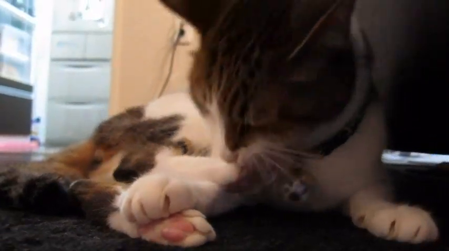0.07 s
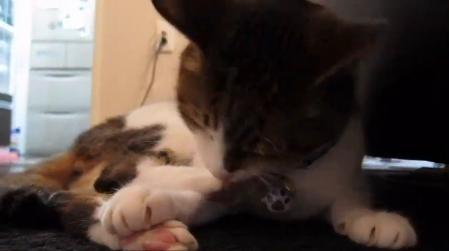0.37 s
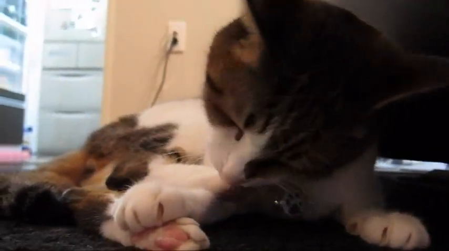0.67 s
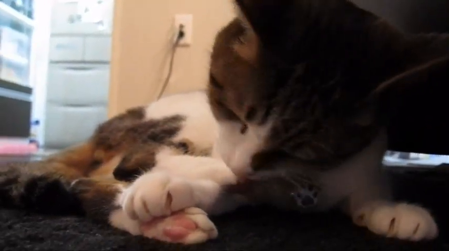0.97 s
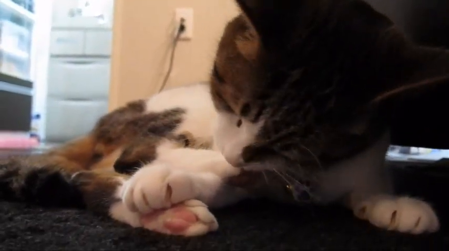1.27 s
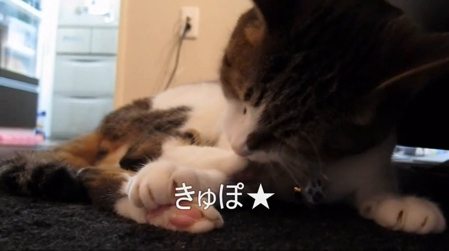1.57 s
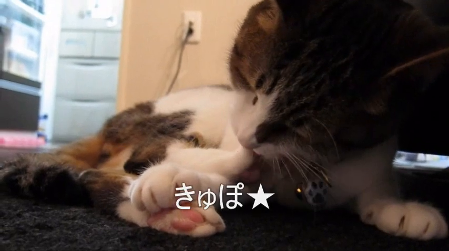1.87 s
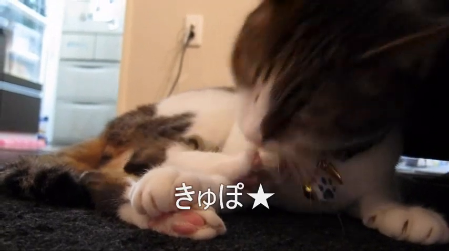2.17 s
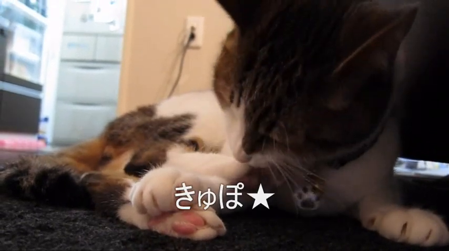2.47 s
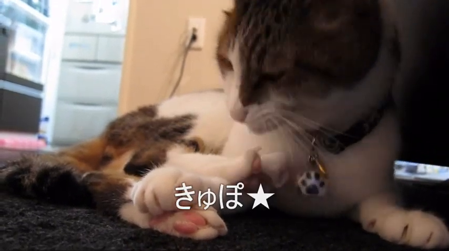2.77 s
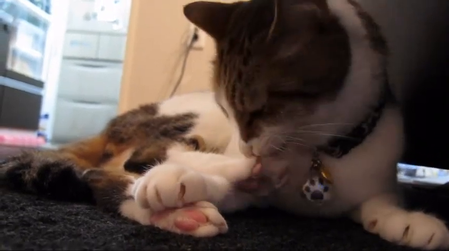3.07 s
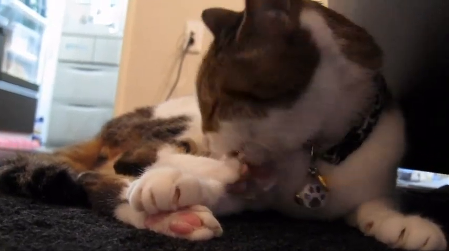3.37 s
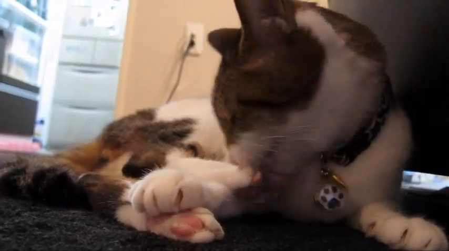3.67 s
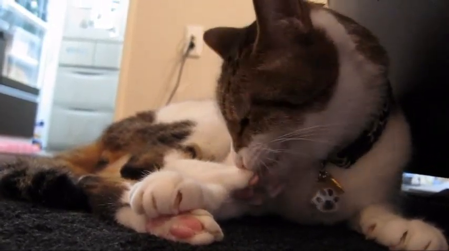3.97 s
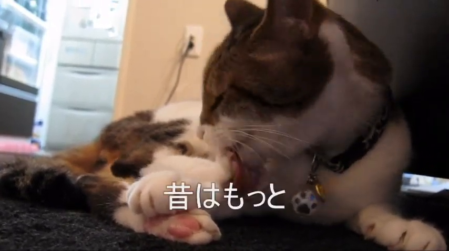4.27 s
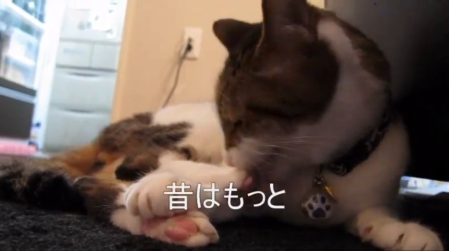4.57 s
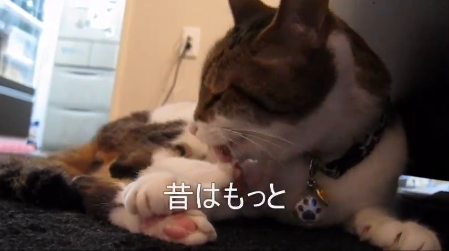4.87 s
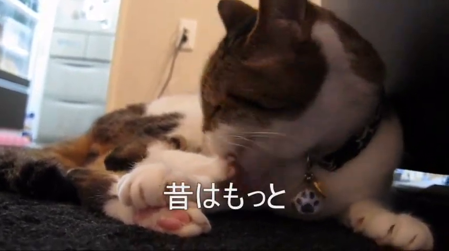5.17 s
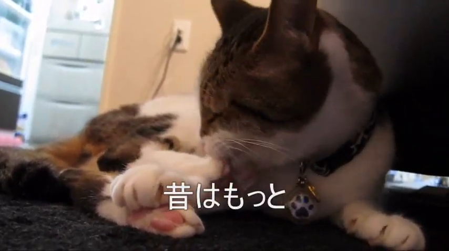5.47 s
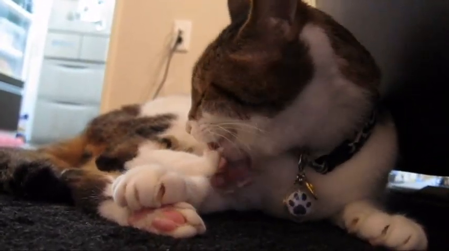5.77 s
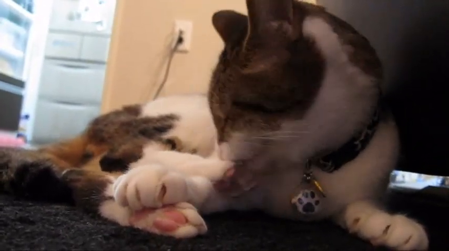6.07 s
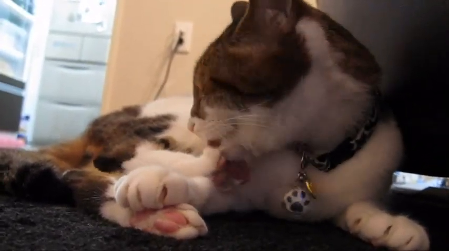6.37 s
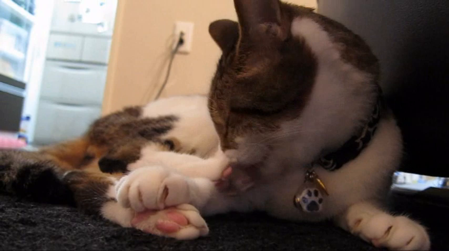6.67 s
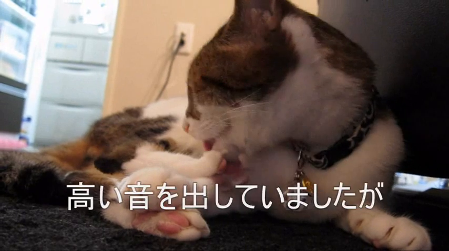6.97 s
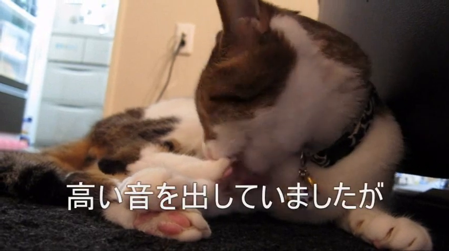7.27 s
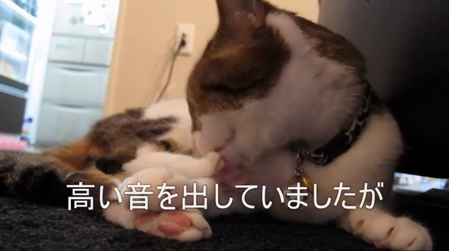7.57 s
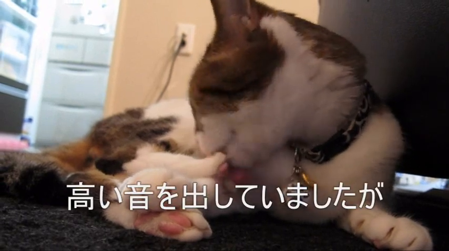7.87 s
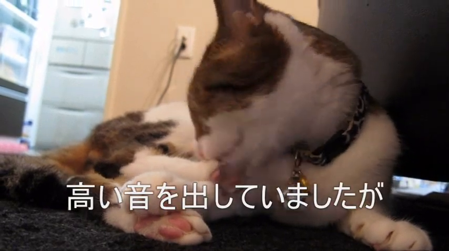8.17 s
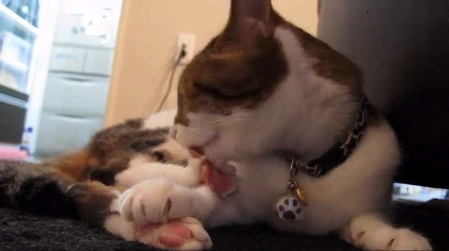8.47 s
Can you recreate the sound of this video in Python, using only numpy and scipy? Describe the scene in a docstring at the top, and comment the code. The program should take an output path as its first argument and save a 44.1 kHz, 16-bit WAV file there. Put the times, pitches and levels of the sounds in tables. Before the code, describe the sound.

Close to the microphone, a cat sucks its paw with short airy hisses and wet smacks. A small pop comes right at the start and a loud, sharp one about a second later, briefly ducking the background. More smacks follow, then the cat settles into soft, raspy licks about twice a second, with tiny saliva clicks. A fan hums steadily in the carpeted room.

```python
"""A fan hums in a carpeted room; close to the microphone, a cat sucks its paw, air hissing past its lips.
The lip seal breaks with a small pop, then at 1.3 s with a sharp one that overloads the recorder:
its gain control ducks the room and lets it swell back. Wet smacks follow, and from about 3 s the
rough tongue strokes the fur twice a second, each lick a rasp, a click and a crackle of saliva.
Around 6 s a low rumble swells and fades beneath the licking."""
import sys
import numpy as np
from scipy import signal
from scipy.fft import rfft, irfft, next_fast_len
from scipy.io import wavfile
from scipy.ndimage import uniform_filter1d

SR = 44100
rng = np.random.default_rng(int(sys.argv[2]) if len(sys.argv) > 2 else 0)


def transcribe(u):
    """Save the signal u as a 16-bit wav file named by the first command-line argument.

    u: samples, shape (n,) or (channels, n), limited to [-1, 1]; the rate is SR.
    q: integer samples, one column per channel.
    """
    v = np.clip(np.atleast_2d(u).T, -1, 1)
    q = np.round(v * 32767).astype(np.int16)
    wavfile.write(sys.argv[1], SR, q)


N = 384552
TIME = np.arange(N) / SR
CLICK_TIME = TIME[:4096]
POP_LEAD_SAMPLES = 64

# the fan's rumble: frequency_hz, level_db
FAN_COLOUR = [(20, -9), (35, -3.5), (90, 1.5), (170, 0.5), (330, 1.5), (430, -6), (600, -9), (880, -10),
              (1150, -14.5), (2000, -20.5), (4200, -25.5), (6000, -29.5), (8000, -40.5), (16000, -45.5)]
# the fan's hum: pitch_hz, level_db, wander_hz
FAN_TONES = [(88.4, -60.5, 2.5), (131.4, -50, 1.17), (265, -68, 2.5), (299.6, -58.5, 3), (519, -66.5, 1.46),
             (800, -53.5, 0.45)]
# microphone hiss: frequency_hz, level_db
MIC_COLOUR = [(2000, -6.5), (8000, -3), (10800, 1), (12300, -3), (14000, -5.5), (15700, -3.5)]
# faint electronic whine: pitch_hz, level_db, wander_hz
WHINE_TONES = [(4428, -72.5, 1), (8328, -78.5, 1), (8796, -83, 1), (13254, -85, 1), (13722, -82, 1)]
# one low swell in the room: middle_s, half_length_s, level_db, centre_hz
ROOM_SWELL = (6, 0.2, -42, 79)
# soft thuds of jaw and paw: start_s, level_db, pitch_hz, t60_s
THUDS = [(.185, -22.5, 127.8, 0.055), (0.787, -29, 150, 0.033), (1.284, -19.5, 125, .05),
         (1.329, -19, 279.7, 0.042), (1.332, -21.5, 80, .09), (2.082, -24, 307, 0.022),
         (5.2773, -27.5, 260, 0.048)]
# licks, timed by the tongue's return to the mouth: return_s, rasp_db, click_db, cavity_hz, crackle_db
TONGUE_LICKS = [(3.226, -60, -62, 4800, -58.5), (3.655, -54.5, -46, 6500, -51),
                (4.078, -54.5, -58, 7000, -52), (4.56, -52.5, -43.5, 7000, -52),
                (5.102, -57, -51, 7800, -53.5), (5.63, -58.5, -43, 1500, -52),
                (6.135, -59, -57, 3000, -54.5), (6.657, -58, -55, 6000, -55),
                (7.2174, -60, -45.5, 7500, -55), (7.762, -59, -59, 7000, -55),
                (8.2704, -64, -49, 3500, -59.5), (8.75, -62, -60, 7000, -60)]
# barbs rasping on fur: frequency_hz, level_db
RASP_COLOUR = [(800, -5.5), (2500, 5), (4500, -0.5), (6500, -1), (8200, -5.5), (9700, -2.5), (11000, 2),
               (12200, -1.5), (14000, -8.5), (15800, -12.5)]
# saliva crackling on the tongue: frequency_hz, level_db
CRACKLE_COLOUR = [(2000, -20), (5500, -8.5), (7500, -0.5), (10000, 3), (12000, 1.5), (14000, -3),
                  (15800, -7.5)]
# resonances of the pursed mouth: centre_hz, width_hz, gain_db
MOUTH_RESONANCES = [(4710, 700, -3.5), (5900, 490, 1.5), (10500, 580, -4.5), (11300, 500, -4.5)]
# air drawn in between lips and paw: full_flow_s, hold_s, level_db, swell_s_per_10_db, close_s_per_10_db
PAW_SUCKS = [(.018, .012, -54.5, .025, .03), (.138, .037, -51.5, .03, .018), (.45, .025, -47, .045, .055),
             (.645, .025, -44, .13, .06), (.762, .015, -43, 0.07, .035), (.85, .015, -49.5, .05, .05),
             (.94, .014, -46.5, 0.03, .02), (1.103, .01, -37.5, .03, .025),
             (1.145, .011, -39.5, .025, .008), (1.288, .042, -37, .006, .01)]
# the hiss of that air: frequency_hz, level_db
SUCK_COLOUR = [(300, -3), (900, 4.5), (1700, -2), (3000, -1.5), (4300, -1.5), (5200, -6), (6000, -4.5),
               (7200, -3.5), (8400, -8.5), (10000, -5), (11700, -7.5), (14000, -8.5), (15600, -15.5)]
# featured smacks of tongue and lips: start_s, cavity_hz, ring_db, snap_db, spray_db
WET_SMACKS = [(.069, 1800, -46, -55, -49), (.104, 3800, -49, -45.5, -57), (.155, 2700, -48, -46, -48),
              (.2162, 4400, -35, -38, -37.5), (.2342, 4400, -37.5, -36, -44), (.302, 2200, -36, -48, -59),
              (.3348, 7360, -59, -56, -50), (.3988, 900, -43, -52, -69), (.4349, 3800, -41, -44, -57),
              (.7845, 1050, -33, -28.5, -35.5), (.897, 960, -28, -29.5, -41), (.928, 1070, -42, -49, -56),
              (.9704, 7580, -67, -60, -51), (1.0656, 3400, -49, -41, -42),
              (1.2838, 1003, -35.5, -36, -43.5), (1.69, 800, -34.5, -47, -48),
              (2.0819, 2820, -28.5, -39, -31), (2.091, 530, -30, -50, -50), (2.5673, 3300, -48, -53, -58.5),
              (2.6525, 1400, -34, -48, -61), (2.7411, 560, -35, -48, -50), (2.8014, 726, -39.5, -45.5, -47),
              (3.0602, 3190, -53, -59, -51), (3.2644, 5200, -51, -51, -63), (3.922, 870, -38.5, -56, -70),
              (3.9746, 1770, -52, -52, -51), (4.9877, 1640, -54, -52, -41.5),
              (5.2783, 2800, -36.5, -39, -41), (5.5101, 4500, -45, -46, -38),
              (6.4509, 890, -39.5, -51, -70), (6.8372, 4300, -43.5, -50, -65), (7.16, 7660, -56, -65, -51)]
# the snap of wet skin parting: frequency_hz, level_db
SKIN_SNAP_COLOUR = [(500, 0.5), (1400, 1.5), (3000, 2), (6000, -4.5), (7500, -5.5), (9500, -28.5),
                    (16000, -37.5)]
# the fine spray of saliva: frequency_hz, level_db
SALIVA_SPRAY_COLOUR = [(4000, -39.5), (8500, -16), (9900, -1), (11200, -4.5), (12400, -1.5), (13800, -17.5),
                       (15600, -5.5)]
# breaks of the lip seal: start_s, level_db, hold_s, brightness_db
SEAL_POPS = [(0.1833, -14, 0.00091, -9.5), (1.3290, -3.5, 0.0013, -2.5)]
# the crack of the seal: frequency_hz, level_db
SEAL_COLOUR = [(200, -7), (1000, -7), (1500, -12.5), (3200, -6), (4800, -2.5), (6000, -1.5), (7000, 1),
               (8300, -5.5), (10700, 2.5), (12200, 1), (13800, -10.5), (15600, 5.5)]
# thin hiss lingering after the last pop: level_db, t60_s, centre_hz
POP_HISS = (-40, 0.19, 4700)


def from_db(db):
    """Decibels to gain."""
    return 10 ** (np.asarray(db) / 20)


def rms_one(x):
    """Scale to rms 1."""
    return x / np.sqrt(np.mean(x ** 2) + 1e-20)


def unit_click(x, span_s=.005):
    """Scale a click to the energy of rms 1 held for span_s."""
    return x * np.sqrt(span_s * SR / (np.sum(x ** 2) + 1e-20))


def add(out, start_s, sound):
    """Mix a short sound in at start_s."""
    at = max(int(start_s * SR), 0)
    out[at:at + len(sound)] += sound[:max(N - at, 0)]


def coloured(x, colour):
    """Minimum-phase EQ along a colour curve, rolling off below its first point."""
    size = next_fast_len(len(x) // 2 + 1) * 2
    hz = np.fft.rfftfreq(size, 1 / SR) + 1
    points_hz, points_db = np.transpose(colour)
    gain = from_db(np.interp(np.log(hz), np.log(points_hz), points_db))
    gain /= np.hypot(1, (.5 * points_hz[0] / hz) ** 2)
    cepstrum = irfft(np.log(gain))
    cepstrum[1:size // 2] *= 2   # folded forward, so nothing rings ahead of an attack
    cepstrum[size // 2 + 1:] = 0
    return irfft(rfft(x, size) * np.exp(rfft(cepstrum)))[:len(x)]


def band_noise(hz, octaves):
    """A band of noise around hz; rms 1."""
    edges = np.clip(hz * 2 ** (np.array([-.5, .5]) * octaves), 10, .45 * SR)
    band = signal.butter(2, edges, "band", fs=SR, output="sos")
    return rms_one(signal.sosfilt(band, rng.standard_normal(N)))


def drift(per_s):
    """A wobble that slides between per_s random values a second; rms 1."""
    knots = rng.standard_normal(4096)
    return rms_one(np.interp(TIME * per_s, np.arange(len(knots)), knots))


def grains(per_s, spread_db):
    """Random tiny clicks of uneven size; rms 1."""
    sizes = from_db(spread_db * np.minimum(rng.exponential(1, N), 4)) * rng.choice([-1, 1], N)
    return rms_one(sizes * (rng.random(N) < per_s / SR))


def ring(hz, t60, glide):
    """A damped sine whose pitch rises by the share glide as it dies."""
    bend = 1 + glide * (np.minimum(CLICK_TIME / t60, 1) - .2)
    return np.sin(2 * np.pi * np.cumsum(hz * bend) / SR) * from_db(-60 * CLICK_TIME / t60)


def room_tone(fan_db=-43, hiss_db=-65):
    """The bed: fan rumble and wavering hum, with microphone hiss and a faint electronic whine."""
    rumble = from_db(fan_db) * rms_one(coloured(rng.standard_normal(N), FAN_COLOUR))
    hiss = from_db(hiss_db) * rms_one(coloured(rng.standard_normal(N), MIC_COLOUR))
    tones = np.zeros(N)
    for hz, db, wander_hz in FAN_TONES + WHINE_TONES:
        phase = 2 * np.pi * np.cumsum(hz + wander_hz * drift(per_s=14)) / SR
        tones += from_db(db) * np.sqrt(2) * np.sin(phase)
    return rumble + hiss + tones


def low_swell():
    """A dull rumble that comes and goes once."""
    middle_s, half_s, db, hz = ROOM_SWELL
    return from_db(db) * band_noise(hz, octaves=.42) / (1 + ((TIME - middle_s) / half_s) ** 2)


def reflections(x, wet_db=-31, t60=.13, predelay_s=.003, dull_hz=6000):
    """A faint, short and dull tail from the carpeted room."""
    t = TIME[:SR // 3]
    tail = rng.standard_normal(len(t)) * from_db(-60 * t / t60) * (t > predelay_s)
    tail = signal.sosfilt(signal.butter(2, dull_hz, fs=SR, output="sos"), tail)
    return from_db(wet_db) * signal.fftconvolve(x, tail / np.linalg.norm(tail))[:N]


def thuds():
    """Jaw and paw give way with a dull, quickly damped thud."""
    out = np.zeros(N)
    for start_s, db, hz, t60 in THUDS:
        add(out, start_s, from_db(db) * ring(hz, t60, glide=0))
    return out


def strokes(drag_lead_s=.187, crackle_lag_s=.028):
    """A lick is a mostly dry drag, then a short wet return: middle_s, half_length_s, level_db, wet_share."""
    drags = [(s - drag_lead_s, .047, rasp_db, .25) for s, rasp_db, *_ in TONGUE_LICKS]
    returns = [(s + crackle_lag_s, .03, crackle_db, .7) for s, *_, crackle_db in TONGUE_LICKS]
    return drags + returns


def licking(idle_db=-70):
    """Tongue barbs drag through hairs with a broad rasp; drawn back, the wet tongue crackles higher up."""
    rasp_power = crackle_power = from_db(idle_db) ** 2 / 2
    for middle_s, half_s, db, wet_share in strokes():
        power = from_db(db) ** 2 * np.exp(-2 * np.minimum(((TIME - middle_s) / half_s) ** 2, 20))
        rasp_power = rasp_power + power * (1 - wet_share)
        crackle_power = crackle_power + power * wet_share
    rasp = rms_one(coloured(grains(per_s=9000, spread_db=8), RASP_COLOUR))
    crackle = rms_one(coloured(grains(per_s=600, spread_db=5), CRACKLE_COLOUR))
    return np.sqrt(rasp_power) * rasp + np.sqrt(crackle_power) * crackle


def stray_smacks(from_s=2.9, per_s=3, low_hz=3500, high_hz=7850, spread_db=2.5):
    """Tiny saliva films part at random moments, each with its own cavity; rows like WET_SMACKS."""
    ring_db, snap_db, spray_db = -59, -60, -54
    timing, pitch, strength = rng.random((64, 3)).T
    times = from_s + (np.arange(len(timing)) + timing) / per_s
    cavities = low_hz * (high_hz / low_hz) ** pitch
    trims_db = spread_db * (2 * strength - 1)
    return [(s, hz, ring_db + trim, snap_db + trim, spray_db + trim)
            for s, hz, trim in zip(times, cavities, trims_db) if s < N / SR]


def tongue_clicks(shut_hz=7000, shut_body_db=-10, open_db_per_octave=3):
    """The returning tongue clicks, fuller in a wider, lower cavity; rows like WET_SMACKS."""
    rows = []
    for return_s, _, click_db, hz, _ in TONGUE_LICKS:
        body_db = click_db + shut_body_db + open_db_per_octave * np.log2(shut_hz / hz)
        rows.append((return_s, hz, body_db, body_db, click_db))
    return rows


def cavity_ring(hz, upper_ratio=1.39, upper_db=-8, glide=.091):
    """Two rising resonances of the mouth cavity; a bigger, lower cavity rings longer."""
    t60 = .0028 + 9 / hz   # nine cycles on top of the shortest decay
    upper = from_db(upper_db) * ring(hz * upper_ratio, t60 / upper_ratio, glide)
    return unit_click(ring(hz, t60, glide) - upper)


def snap_colour(cavity_hz, tracking=.16, low_cut_db=-24):
    """A bigger cavity snaps duller, and little sound escapes below its resonance."""
    points_hz, points_db = np.transpose(SKIN_SNAP_COLOUR)
    points_hz = points_hz * (cavity_hz / 2500) ** tracking
    octaves_below = np.clip(np.log2(.8 * cavity_hz / points_hz), 0, 1)
    return np.c_[points_hz, points_db + low_cut_db * octaves_below]


def rupture(colour, t60):
    """A saliva film tears: a burst of micro-snaps that dies within milliseconds."""
    burst = rng.standard_normal(len(CLICK_TIME)) * from_db(-60 * CLICK_TIME / t60)
    return unit_click(coloured(burst, colour))


def smacks():
    """Each parting of wet skin snaps, sprays and rings the mouth cavity."""
    out = np.zeros(N)
    for start_s, hz, ring_db, snap_db, spray_db in WET_SMACKS + tongue_clicks() + stray_smacks():
        cavity = from_db(ring_db) * cavity_ring(hz)
        snap = from_db(snap_db) * rupture(snap_colour(hz), t60=.01)
        spray = from_db(spray_db) * rupture(SALIVA_SPRAY_COLOUR, t60=.0039)
        add(out, start_s, cavity + snap + spray)
    return out


def mouth(x):
    """The mouth's resonances add their ring to what passes the lips."""
    return x + sum(from_db(db) * signal.lfilter(*signal.iirpeak(hz, hz / width_hz, fs=SR), x)
                   for hz, width_hz, db in MOUTH_RESONANCES)


def suck_level_db(leak_db=-63, fade_s_per_10_db=.03):
    """Each suck swells, holds and is shut off, over a faint leak that fades after the last pop."""
    since_last_pop = np.maximum(TIME - SEAL_POPS[-1][0], 0)
    envelopes = [leak_db - 10 * since_last_pop / fade_s_per_10_db]
    for full_flow_s, hold_s, db, swell, close in PAW_SUCKS:
        attack_db = 10 * np.maximum(full_flow_s - TIME, 0) / swell
        release_db = 10 * np.maximum(TIME - full_flow_s - hold_s, 0) / close
        envelopes.append(db - attack_db - release_db)
    return np.max(envelopes, axis=0)


def suction(fizz_db=-5, flutter_db=1.5):
    """A narrow leak of air with fizzing saliva, coloured by the mouth."""
    leak = rng.standard_normal(N) + from_db(fizz_db) * grains(per_s=1300, spread_db=5.5)
    level_db = suck_level_db() + flutter_db * drift(per_s=90)
    return from_db(level_db) * rms_one(mouth(coloured(leak, SUCK_COLOUR)))


def seal_tear(hold_s, t60=.004):
    """A tear excites all frequencies nearly alike: a burst with its peaks and gaps half evened out."""
    envelope = from_db(-60 * np.maximum(CLICK_TIME - hold_s, 0) / t60)
    burst = rng.choice([-1, 1], len(CLICK_TIME)) * envelope
    spectrum = rfft(np.roll(burst, POP_LEAD_SAMPLES))
    return irfft(spectrum / np.sqrt(np.abs(spectrum) + 1e-9))[:len(burst) // 2]


def pops(shelf_hz=5500):
    """The lip seal breaks in a dense crack of a millisecond or two; a thin hiss trails the last pop."""
    out = np.zeros(N)
    for start_s, db, hold_s, bright_db in SEAL_POPS:
        colour = [(hz, level + bright_db * np.clip(np.log2(hz / shelf_hz), 0, 1))
                  for hz, level in SEAL_COLOUR]
        crack = unit_click(mouth(coloured(seal_tear(hold_s), colour)))
        add(out, start_s - POP_LEAD_SAMPLES / SR, from_db(db) * crack)
    hiss_db, t60, hiss_hz = POP_HISS
    fade = from_db(hiss_db - 60 * TIME[:SR // 2] / t60)
    add(out, SEAL_POPS[-1][0], band_noise(hiss_hz, octaves=.35)[:len(fade)] * fade)
    return out


def scene():
    """The cat up close, the room behind it, in mono."""
    cat = pops() + smacks() + thuds() + suction() + licking()
    return (cat + reflections(cat) + room_tone() + low_swell())[None]


def gain_control(x, threshold_db=-19, charge_db=77, release_s=.35, attack_s=.016):
    """Sound above the threshold charges a slowly leaking store, which ducks the whole mix."""
    level = np.sqrt(np.abs(uniform_filter1d(x ** 2, size=44)))   # rms over 1 ms
    excess = np.maximum(level - from_db(threshold_db), 0) ** 2
    store = signal.lfilter([from_db(charge_db) / SR], [1, -np.exp(-1 / (release_s * SR))], excess)
    ease = np.exp(-1 / (attack_s * SR))
    cut_db = signal.lfilter([1 - ease], [1, -ease], 20 * np.log10(1 + store))
    return x * from_db(-cut_db)


def record(dry):
    """Gain control, soft overload on the sharpest peaks, and a steep top cut."""
    ceiling, cutoff_hz = .8, 16050
    saturated = ceiling * np.tanh(gain_control(dry) / ceiling)
    size = next_fast_len(N + SR // 10)
    top_cut = 1 / (1 + (np.fft.rfftfreq(size, 1 / SR) / cutoff_hz) ** 100)
    return irfft(rfft(saturated, size) * top_cut, size)[:, :N]


dry = scene()
out = record(dry)
transcribe(out)
```